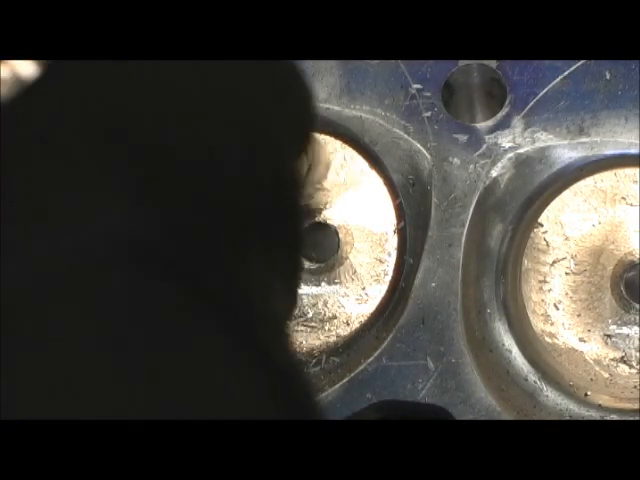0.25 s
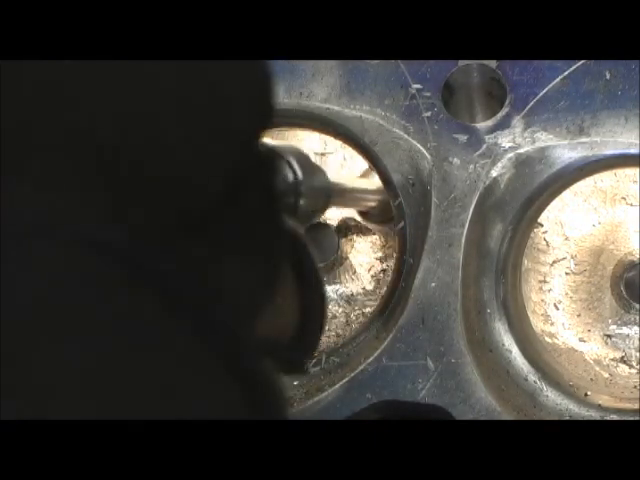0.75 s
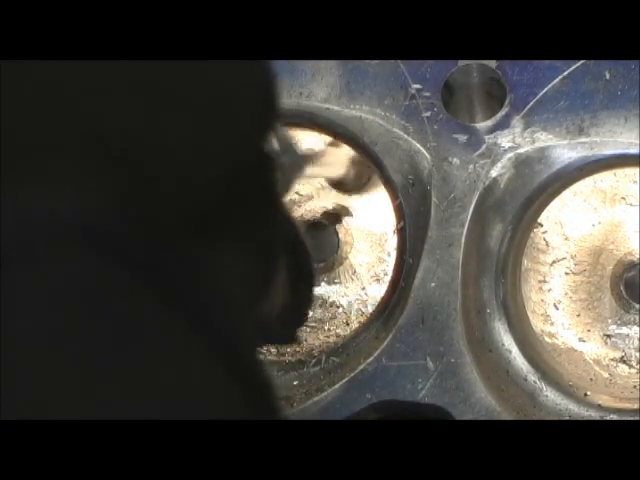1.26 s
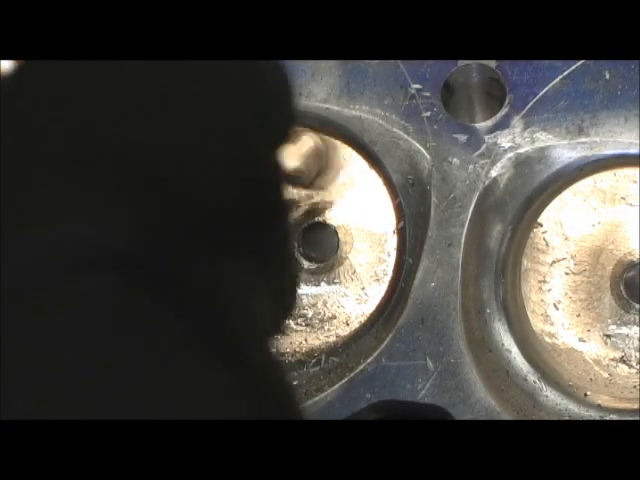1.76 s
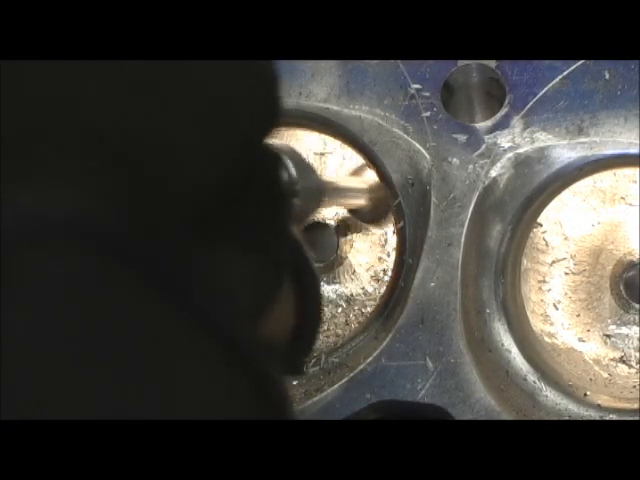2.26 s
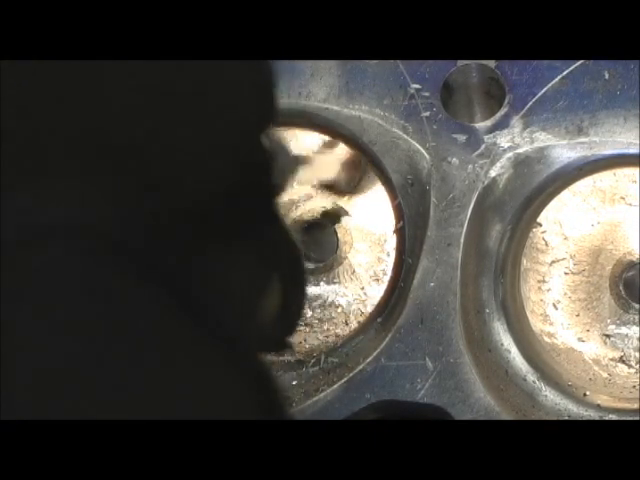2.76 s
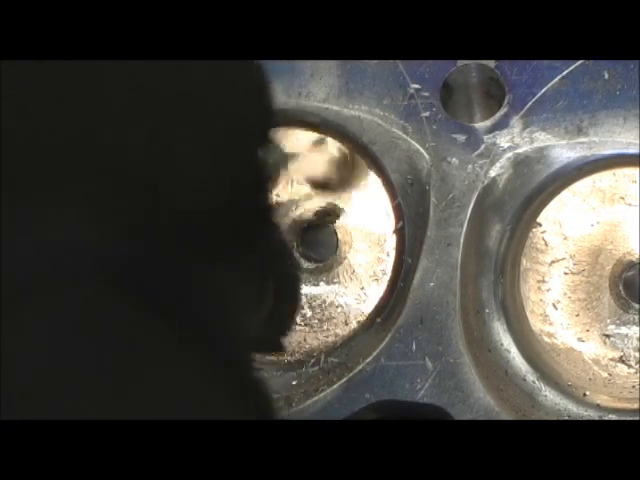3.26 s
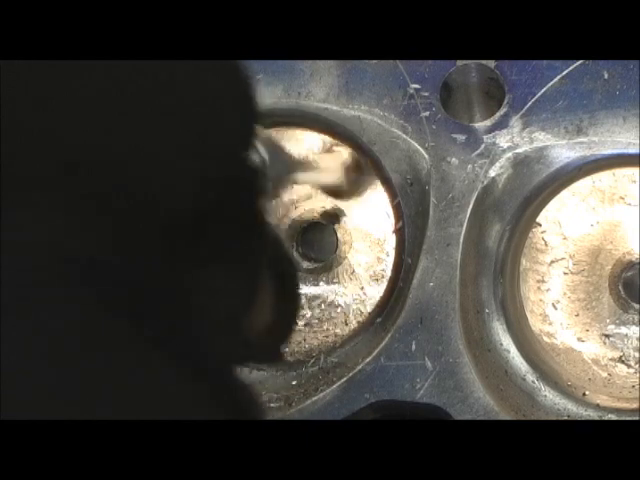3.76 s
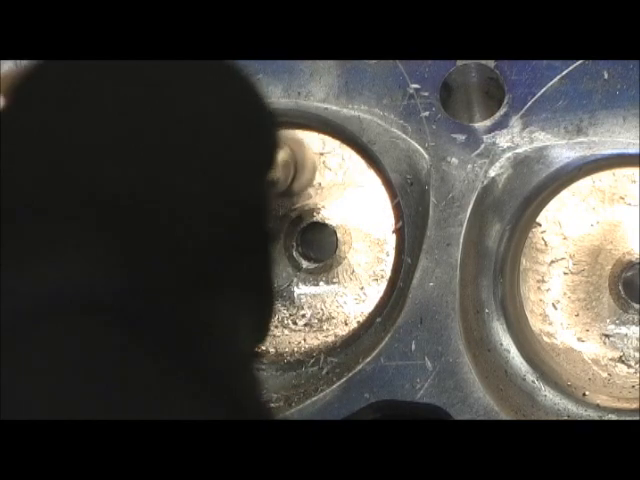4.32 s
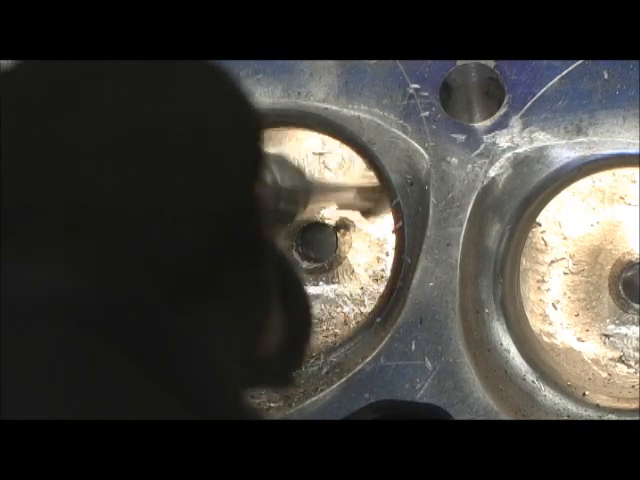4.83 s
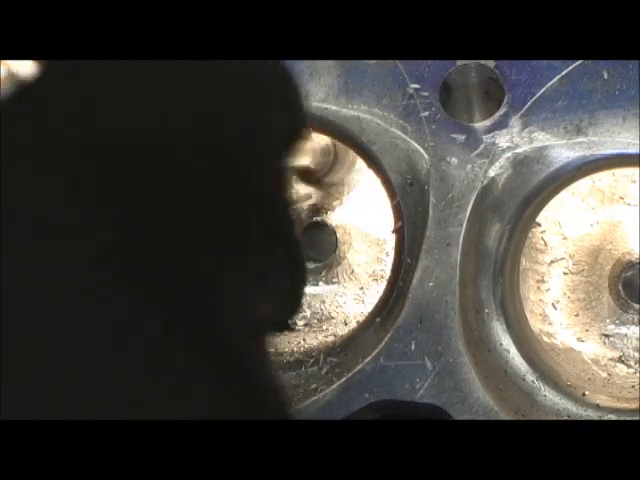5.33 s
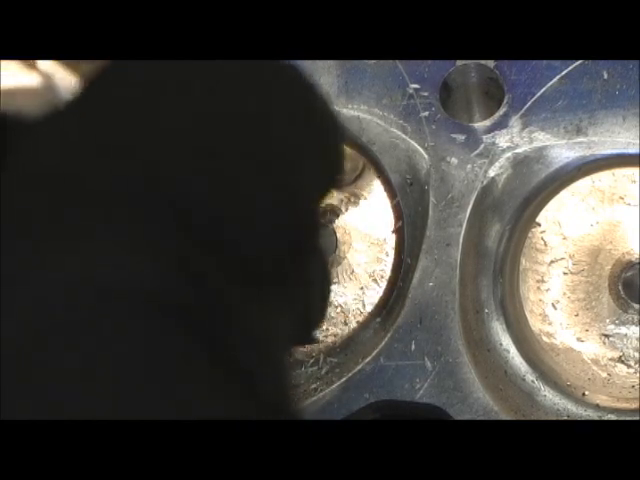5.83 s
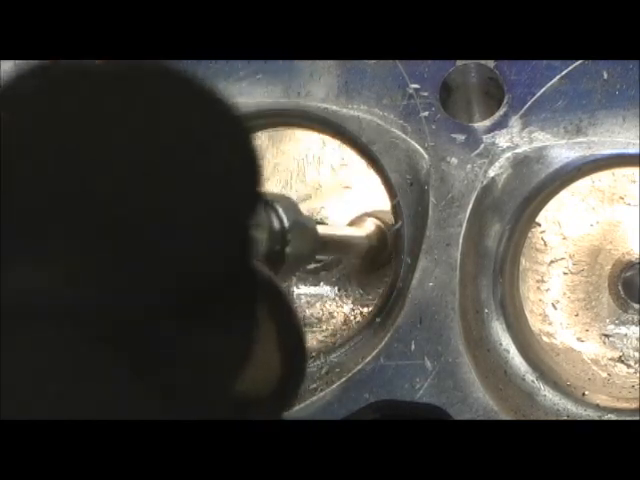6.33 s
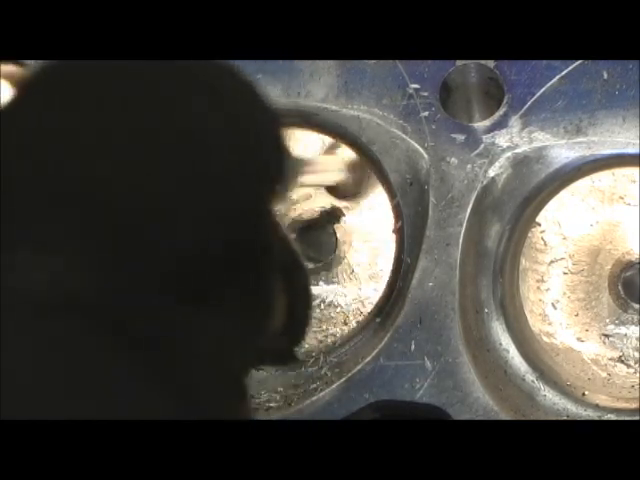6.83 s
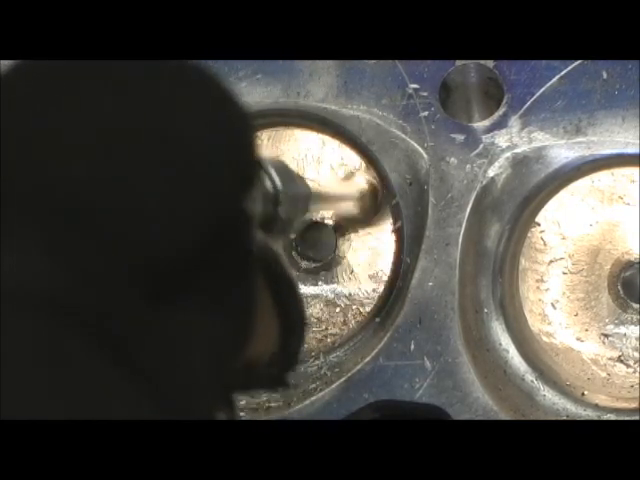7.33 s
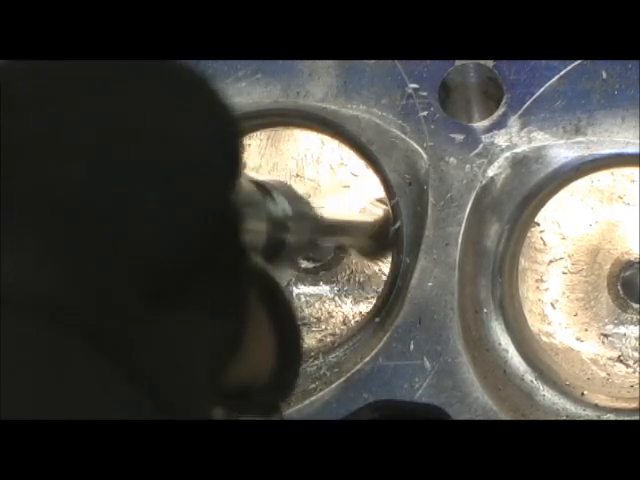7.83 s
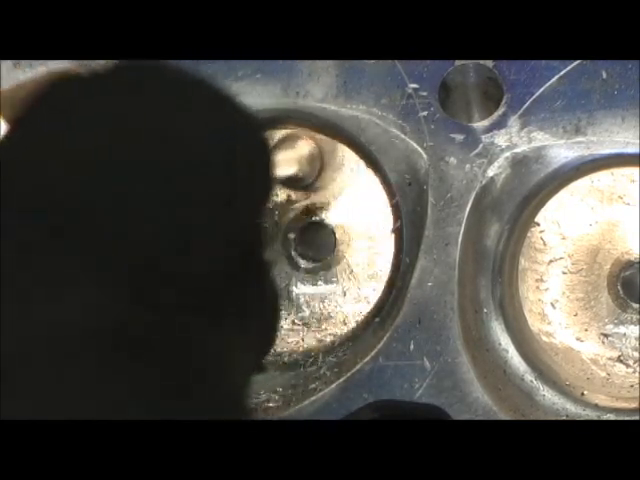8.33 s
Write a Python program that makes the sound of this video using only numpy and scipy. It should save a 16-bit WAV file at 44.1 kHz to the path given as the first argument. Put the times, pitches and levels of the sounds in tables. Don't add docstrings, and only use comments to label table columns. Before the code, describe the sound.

Continuous metal cutting with a small spinning burr in a cylinder head port. The motor's nasal whine wobbles down and back with each stroke, gritty hiss flares as the tool draws back, and the casting sings thinly. Hard snags click and crack irregularly. From about five seconds the whine sits lower and the tool body drums more. Two close microphones, almost no room.

```python
import sys
import numpy as np
from scipy import signal
from scipy.fft import rfft, irfft, next_fast_len
from scipy.io import wavfile
from scipy.ndimage import uniform_filter1d

SR = 44100
rng = np.random.default_rng(int(sys.argv[2]) if len(sys.argv) > 2 else 0)


def nominal_scale(level):
    x = np.asarray(level, float) / 20
    return 10 ** x


def put_to_file(sound):
    columns = np.atleast_2d(sound).T
    safe = np.clip(columns, -1, 1)
    whole_steps = np.round(safe * 32767)
    wavfile.write(sys.argv[1], SR, whole_steps.astype(np.int16))


N = 378378

VANES = 5
# (time [s], vane rate [Hz], vane tone level [dB])
LEANING = [(0.0, 1362, -30), (0.62, 1375, -28.5), (1.4, 1396, -29.5), (1.8, 1409, -30.5),
           (3.9, 1401, -29.5), (4.75, 1390, -29), (5.02, 1370, -30), (5.15, 1312, -28), (5.9, 1312, -31),
           (6.3, 1302, -24.5), (6.74, 1312, -28.5), (6.82, 1369, -27.5), (7.12, 1387, -29),
           (7.22, 1333, -28.5), (7.63, 1378, -28.5), (7.9, 1346, -27.5), (8.42, 1334, -29),
           (8.58, 1318, -32.5)]
# (deepest time [s], build [s], ease [s], drop in vane rate [Hz])
PUSHES = [(.11, .16, 0.18, 110.2), (.34, .04, 0.037, 29), (0.501, .11, .12, 121), (0.919, 0.27, .13, 100),
          (1.15, 0.097, 0.074, 52), (1.29, .07, 0.055, 50), (1.47, 0.09, 0.11, 45), (1.6, .12, .09, 68),
          (1.95, .2, .18, 87), (2.34, .28, .13, 145), (2.77, .25, .12, 59), (3.06, .22, 0.12, 107.7),
          (3.4, .14, .12, 83.33), (3.78, .26, 0.098, 113), (3.95, .09, .24, 100.1), (4.25, .25, 0.078, 95),
          (4.61, .13, 0.098, 97), (4.94, .17, 0.082, 55), (5.31, .06, .24, 57.93), (5.695, .12, .2, 160),
          (6.42, 0.063, 0.079, 31.97), (7.02, .2, .1, 52), (7.55, .17, 0.081, 55.05),
          (7.74, 0.094, .13, 54.86), (7.98, 0.0799, 0.0897, 61.85), (8.155, .08, 0.093, 61.9),
          (8.315, .08, .1, 48.06), (8.54, .12, .25, 185)]
# (multiple of shaft rate, level against the vane tone [dB])
SHAFT_TONES = [(4, -19), (10, -36), (15, -17.5)]
# (middle time [s], length [s], level [dB])
DRUMMING = [(.02, 0.11, -45), (.4, .12, -46), (.82, .14, -40.5), (1.0, .08, -54), (1.19, 0.11, -39),
            (1.62, 0.098, -50), (1.95, .2, -43.5), (2.25, .17, -44), (2.7, 0.19, -58), (3.05, .25, -51),
            (3.4, 0.099, -52), (3.72, .18, -49), (4.15, 0.23, -45), (4.6, 0.096, -57), (5.17, 0.31, -45),
            (5.41, 0.096, -49), (5.59, .14, -43), (6.13, .3, -42.5), (6.55, .6, -42), (7.03, .1, -42),
            (7.42, .5, -46), (8.05, 0.68, -44)]
DRUM_IDLE_DB = -52.5
EXHAUST_HZ, EXHAUST_WIDTH_HZ, EXHAUST_DB = 1326, 16.6, 2.5

# (frequency [Hz], width [Hz], level [dB])
HOUSING_MODES = [(192.4, 10.3, -5), (214.4, 12, -5), (328.1, 14, -4), (395, 14.5, -2.5), (419.7, 22, -2.5),
                 (489.4, 14.5, -0.5), (588, 14, -6.5), (673, 51, -2)]
# (frequency [Hz], level [dB per Hz])
BENCH_COLOUR = [(18, -47), (30, -14), (97, 5.5), (114, 6.5), (140, -6), (160, -16.5), (210, -34),
                (350, -120)]
FREE_HZ = 1399
HOUSING_DB, HOUSING_DB_PER_SAG = -40.5, 0.0629
BENCH_DB, BENCH_DB_PER_SAG = -56.5, -0.0459

# (frequency [Hz], level [dB per Hz])
RASP_COLOUR = [(88, -61), (150, -23.5), (243, -18.5), (354, -20), (493, -15.5), (775, -19), (1050, -6),
               (1220, -15), (1330, -2), (1500, -6.5), (2000, 0.5), (2160, -5.5), (2550, 3), (2960, -3),
               (5500, -13.5), (7150, -45.5), (12100, -120)]
# (frequency [Hz], level [dB per Hz])
BRIGHT_COLOUR = [(2350, -24), (4000, -8.5), (4240, -10.5), (4560, -4), (5270, -5), (5870, -0.5),
                 (8140, 1.5), (8820, -1.5), (12000, -5.5), (13100, -20), (14500, -7.5), (15700, -29)]
# (frequency [Hz], level [dB per Hz])
SIDE_COLOUR = [(2470, -33.5), (4200, -8.5), (4960, -22), (5660, -3.5), (5880, -12), (9110, -1.5),
               (11400, -3.5), (14800, -18), (15700, -13.5)]
RASP_DB, BRIGHT_DB = -22, -24.5
SIDE_DB = -6
# (middle time [s], length [s], change in level [dB])
SKIPS = [(0.326, 0.046, 2), (0.37, 0.059, -4.5), (0.669, 0.025, -4), (2.19, 0.037, -2), (2.82, 0.077, -3),
         (2.96, 0.042, -3.5), (4.005, 0.039, 1), (4.05, .09, -7), (5.329, 0.062, -4), (5.378, 0.029, 3),
         (5.7, .08, -2), (6.903, .06, -3), (7.119, 0.045, 3), (7.489, 0.052, -2), (7.65, 0.061, 2),
         (3.606, 0.046, 2), (7.992, .05, -1.5), (8.451, 0.29, 2)]
SLACK_AT, SLACK_S, SLACK_DB = 0.25, 0.13, -5
FLARE_AT, FLARE_RISE_S, FLARE_FALL_S, FLARE_DB, FLARE_RASP_DB = 0.6, 0.03, 0.19, 3.7, 0.6

# (frequency [Hz], width [Hz])
STRONG_MODES = [(3162, 11), (3341, 5.1)]
# (middle time [s], length [s], level [dB])
LOWER_SINGS = [(.3, .24, -32.5), (.68, .2, -30), (1.06, .14, -27), (1.42, .26, -33), (1.742, 0.17, -33),
               (2.08, .1, -33), (2.561, 0.16, -24.5), (2.88, 0.082, -40), (3.243, 0.13, -28),
               (3.6, .18, -31), (3.962, 0.097, -28), (4.404, 0.23, -28.5), (4.78, .14, -30),
               (6.021, .1, -32), (7.837, .08, -36), (8.48, 0.23, -25.5), (7.4, 0.85, -51)]
# (middle time [s], length [s], level [dB])
UPPER_SINGS = [(.45, 0.12, -28), (.86, 0.13, -32), (1.27, .14, -28), (1.52, .1, -36), (1.96, .15, -37),
               (2.33, 0.29, -29.5), (2.73, .12, -25), (3.071, .18, -29.5), (3.35, 0.099, -36),
               (3.7, .15, -32), (4.22, .1, -30), (4.6, .12, -31), (4.96, .2, -30), (5.66, 0.17, -34),
               (6.48, 0.29, -31), (7.15, .12, -33), (7.35, 0.21, -33), (7.64, 0.22, -24.5),
               (7.84, .07, -32), (7.98, 0.073, -30), (8.2, 0.16, -33), (8.55, 0.058, -26), (5.3, 0.51, -44),
               (6.1, .5, -44), (6.85, 0.6, -37)]
LOWER_IDLE_DB, UPPER_IDLE_DB = -36, -38
CASTING_HZ = [1600, 1995, 2500, 2832, 4040, 4530, 5610, 7355, 7995, 8260, 8450, 9030, 9160, 10830, 11790]
# (width [Hz], level [dB])
CASTING_MODES = [(40, -51), (88.5, -35.5), (138, -40), (24.2, -33), (60, -49), (16, -44), (18, -44),
                 (22, -39.5), (60, -35.5), (89.5, -40), (21, -49), (28, -61), (25, -41), (22, -57),
                 (22, -41)]

# (time [s], peak level [dB])
SNAGS = [(0.0902, -3), (0.313, -4), (0.85, -5), (0.937, -9), (1.795, -6), (2.119, -3), (2.1375, -4),
         (2.2964, -1), (3.3278, 0), (3.3689, -9), (4.0121, -5), (4.5062, -5), (4.5579, -4), (4.6006, -8),
         (4.8209, -3), (4.9302, -3), (5.0348, -3), (5.2698, -2), (5.3961, -8), (5.634, -3), (6.5375, -0.5),
         (6.6902, -4), (6.7099, -3), (6.9505, -3), (7.039, 0.5), (7.381, 1), (7.456, -5), (7.6636, -9),
         (7.9177, -5), (8.5677, -0.5)]
# (frequency [Hz], width [Hz], level [dB])
PORT_HOLLOW = [(1344, 560, 7), (2260, 280, 4.5), (3350, 500, 1.5)]
# (start time [s], length [s], first frequency [Hz], last frequency [Hz], level [dB])
STROKES = [(0.158, .14, 2390, 2550, -46), (.53, 0.13, 2340, 2620, -38), (1.629, .13, 2450, 2620, -37),
           (2.381, 0.15, 2380, 2630, -32), (3.09, 0.19, 2404, 2630, -32.5), (3.44, .15, 2410, 2614, -29),
           (3.799, .11, 2405, 2530, -31.5), (4.27, .13, 2421, 2600, -32), (4.631, 0.19, 2375, 2605, -29.5),
           (4.941, .12, 2370, 2520, -33), (6.759, .12, 2400, 2560, -36), (7.061, 0.099, 2420, 2580, -38)]
# (ratio to the middle note, level [dB])
PORT_AIR = [(.78, -2), (1.0, 1.5), (1.251, -3.5)]

# (frequency [Hz], left minus right level [dB])
LEAN_DB = [(4500, 0), (6000, -1.5), (8100, -2.5), (10000, -1.5), (12500, 4)]
# (frequency [Hz], lead [radians])
LEAD_RAD = [(8600, .1), (10400, 0.84), (11500, 1.5), (13400, 1.3), (14000, .8), (15400, 1)]


def set_level(x, db):
    return x * nominal_scale(db) / np.sqrt(np.mean(x ** 2))


def curves(table):
    s, *columns = np.transpose(table)
    t = np.arange(N) / SR
    return [np.interp(t, s, column) for column in columns]


def bumps(rows, power=2.6):
    out = np.zeros(N)
    for top, rise, fall, height in rows:
        first = max(int((top - rise) * SR), 0)
        last = min(int((top + fall) * SR), N)
        span = np.arange(first, last)
        t = span / SR - top
        part = np.clip(np.where(t < 0, t / rise, t / fall), -1, 1)
        out[span] += height * np.abs(np.cos(np.pi / 2 * part)) ** power
    return out


def swells(rows, idle_db):
    humps = [(s, length / 1.66, length / 1.57, nominal_scale(db)) for s, length, db in rows]
    return 20 * np.log10(nominal_scale(idle_db) + bumps(humps, power=1))


def walk(rate):
    k = int(SR / rate)
    steps = np.repeat(rng.standard_normal(N // k + 1), k)
    return 1.16 * uniform_filter1d(uniform_filter1d(steps, k), k)[:N]


def order(turns, k, flicker_db, wobble=0.33):
    gain = np.sqrt(2) * nominal_scale(flicker_db * walk(25))
    return gain * np.sin(2 * np.pi * k * turns + wobble * walk(50))


def colour(x, points, size=4096):
    hz, db = np.transpose(points)
    grid = np.log(np.maximum(np.arange(size // 2 + 1) * SR / size, 1))
    cepstrum = irfft(np.interp(grid, np.log(hz), db) * np.log(10) / 20)
    cepstrum[1:size // 2] *= 2
    cepstrum[size // 2 + 1:] = 0
    return signal.fftconvolve(x, irfft(np.exp(rfft(cepstrum))))[:N]


def ring(x, hz, width_hz):
    return signal.lfilter(*signal.iirpeak(hz, hz / width_hz, fs=SR), x)


def vane_rate():
    return curves(LEANING)[0] - bumps(PUSHES, power=2.1) + 3.99 * walk(18)


def shaking():
    sag = FREE_HZ - curves(LEANING)[0]
    return HOUSING_DB + HOUSING_DB_PER_SAG * sag, BENCH_DB + BENCH_DB_PER_SAG * sag


def motor(turns, vane_hz):
    off = (vane_hz - EXHAUST_HZ) / EXHAUST_WIDTH_HZ
    vane_db = curves(LEANING)[1] + EXHAUST_DB / (1 + off ** 2) + 1.2 * walk(11)
    tone = nominal_scale(0.07) * order(turns, VANES, 0.82, wobble=0.74)
    for k, db in SHAFT_TONES:
        tone = tone + nominal_scale(db) * order(turns, k, 2.7)
    once_db = swells(DRUMMING, DRUM_IDLE_DB)
    once = nominal_scale(once_db - 2.5) * order(turns, 0.99, 1.91)
    shell = 1 / np.sqrt(1 + ((2 * vane_hz / VANES - 518) / 9.6) ** 2)
    twice = nominal_scale(shaking()[0] - 8.5) * shell * order(turns, 2, 6.2, wobble=0.8)
    return tone * nominal_scale(vane_db) + once + twice


def rumble():
    housing_db, bench_db = shaking()
    shake = rng.standard_normal(N)
    housing = np.zeros(N)
    for hz, width, db in HOUSING_MODES:
        mode = set_level(ring(ring(shake, hz, width), hz, 3 * width), db)
        undo_db = (hz < 250) * 1.05 * (housing_db - housing_db.mean())
        housing += mode * nominal_scale(2.0 * walk(6) - undo_db)
    bench = colour(rng.standard_normal(N), BENCH_COLOUR) * nominal_scale(2.0 * walk(6.8))
    return set_level(housing, -5) * nominal_scale(housing_db) + set_level(bench, 0.15) * nominal_scale(bench_db)


def pressure():
    slack_rows = [(s + SLACK_AT * length, SLACK_S, SLACK_S / 2, nominal_scale(db + 27.5))
                  for s, length, _, _, db in STROKES]
    flare_rows = [(s + FLARE_AT * length, FLARE_RISE_S, FLARE_FALL_S, nominal_scale(db + 25.5))
                  for s, length, _, _, db in STROKES]
    slack, flare = bumps(slack_rows), bumps(flare_rows)
    skips = bumps([(s, length / 1.66, length / 1.7, db) for s, length, db in SKIPS])
    rasp_db = RASP_DB + 0.85 * SLACK_DB * slack + FLARE_RASP_DB * flare + skips
    bright_db = BRIGHT_DB + 0.43 * SLACK_DB * slack + FLARE_DB * flare + 0.94 * skips
    return rasp_db, bright_db


def flutes(turns, runout=0.29, chips_per_s=300, chip_db=1, scatter_db=-2.5):
    contact = 1 + runout * np.cos(4 * np.pi * turns) + 0.014 * np.cos(2 * np.pi * turns)
    sizes_db = chip_db + np.minimum(scatter_db * rng.exponential(size=N), 8.0)
    chips = (rng.random(N) < chips_per_s / SR) * nominal_scale(sizes_db)
    fade = np.exp(-1 / (0.00066 * SR))
    return contact + signal.lfilter([1], [1, -fade], chips)


def strong_mode(force, mode, sings, idle_db):
    hz, width = mode
    struck = set_level(ring(force, hz, width), -8.0)
    chatter = nominal_scale(-4.0) * order(np.arange(N) / SR, hz, 1.7, wobble=1.42)
    return nominal_scale(swells(sings, idle_db)) * (struck + chatter)


def burr(turns):
    rasp_db, bright_db = pressure()
    force, other = rng.standard_normal((2, N)) * flutes(turns)
    flutter = 0.2 * walk(16) + 1.0 * walk(40) + 1.0 * walk(100)
    low = set_level(colour(force, RASP_COLOUR), -1.96) * nominal_scale(rasp_db + flutter + 0.14 * walk(25))
    bright = nominal_scale(bright_db + 0.5 * flutter + 0.062 * walk(25))
    high = set_level(colour(force, BRIGHT_COLOUR), -1.1) * bright
    modes = np.zeros(N)
    for hz, (width, db) in zip(CASTING_HZ, CASTING_MODES):
        modes += set_level(ring(force, hz, width), db) * nominal_scale(2.0 * walk(14))
    modes = modes * nominal_scale(1.7 * (bright_db - bright_db.mean()))
    lower = strong_mode(force, STRONG_MODES[0], LOWER_SINGS, LOWER_IDLE_DB)
    upper = strong_mode(force, STRONG_MODES[1], UPPER_SINGS, UPPER_IDLE_DB)
    squeal = bumps([(8.38, 0.1, 0.098, nominal_scale(-29))]) * order(np.arange(N) / SR, 4530, 1.5, wobble=0.87)
    side = set_level(colour(other, SIDE_COLOUR), SIDE_DB) * bright + nominal_scale(-12.5) * lower
    return low + high + modes + squeal + lower + upper, side


def snags(small_per_s=80, small_db=-12, middling_per_s=5.5, middling_db=-10):
    small = small_db + np.minimum(4.0 * rng.standard_normal(N), 4.5)
    middling = middling_db + np.clip(1.8 * rng.standard_normal(N), -6, 2.5)
    blow = (rng.random(N) < small_per_s / SR) * nominal_scale(small)
    blow = blow + (rng.random(N) < middling_per_s / SR) * nominal_scale(middling)
    s, db = np.transpose(SNAGS)
    blow[np.minimum(((s + 0.0008) * SR).astype(int), N - 1)] = nominal_scale(db)
    thud = np.zeros(N)
    for k, (hz, width, gain_db) in enumerate(PORT_HOLLOW):
        thud += (-1) ** k * nominal_scale(gain_db) * ring(blow, hz, width) * SR / (2 * np.pi * width)
    thud = signal.sosfilt(signal.butter(2, 850, "high", fs=SR, output="sos"), thud)
    tail = np.exp(-np.arange(300) / (0.0021 * SR))
    crack = ring(signal.fftconvolve(blow, tail)[:N] * rng.standard_normal(N), 9400, 2900)
    return nominal_scale(-10) * thud + nominal_scale(-7.5) * crack


def port_air():
    t, hz, gain = np.arange(N) / SR, np.zeros(N), np.zeros(N)
    for start, length, from_hz, to_hz, db in STROKES:
        part = (t - start) / length
        on = (part > 0) & (part < 1)
        hz[on] = from_hz + (to_hz - from_hz) * part[on]
        gain[on] = nominal_scale(db) * np.sqrt(np.sin(np.pi * part[on]))
    cycles = np.cumsum(hz) / SR
    return gain * sum(nominal_scale(db) * order(cycles, k, 0.96, wobble=0.74) for k, db in PORT_AIR)


def scene():
    vane_hz = vane_rate()
    turns = np.cumsum(vane_hz / VANES) / SR
    rasp, side = burr(turns)
    near = motor(turns, vane_hz) + rumble() + rasp + snags() + port_air()
    size = next_fast_len(N)
    hz = np.arange(size // 2 + 1) * SR / size
    louder = nominal_scale(np.interp(hz, *np.transpose(LEAN_DB)) / 2)
    earlier = np.exp(0.5j * np.interp(hz, *np.transpose(LEAD_RAD), left=0))
    lean = louder * earlier
    spectrum = rfft(near, size)
    left = irfft(spectrum * lean, size)[:N]
    right = irfft(spectrum / lean, size)[:N]
    return np.array([left + side, right - side])


def roll_off(x):
    return signal.sosfilt(signal.butter(12, 15650, fs=SR, output="sos"), x)


def record(dry):
    rounded = 1.4 * np.tanh(dry / 1.4)
    heard = signal.sosfilt(signal.butter(2, 38, "high", fs=SR, output="sos"), rounded)
    return roll_off(heard)


dry = scene()
out = record(dry)
put_to_file(out)
```